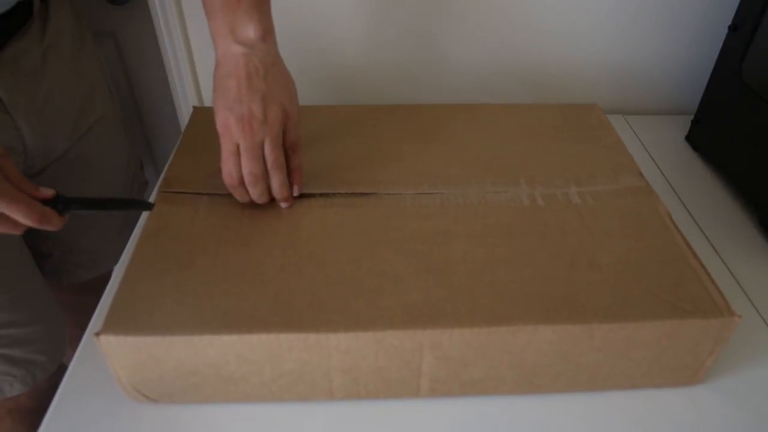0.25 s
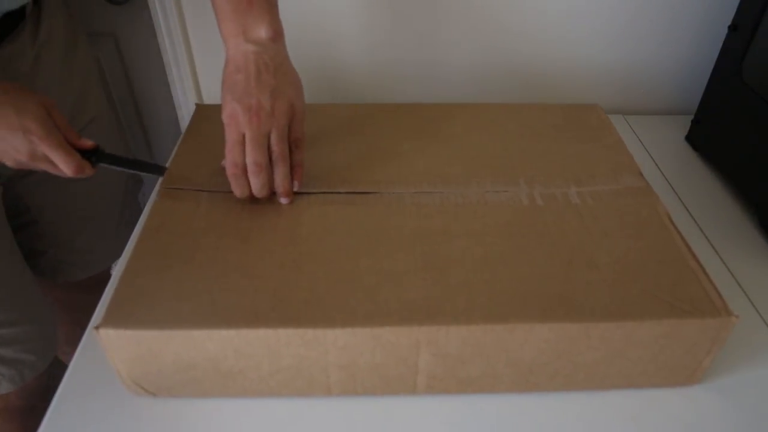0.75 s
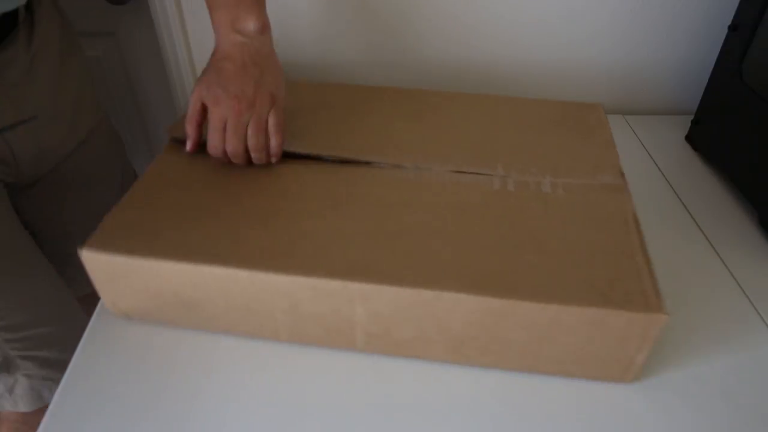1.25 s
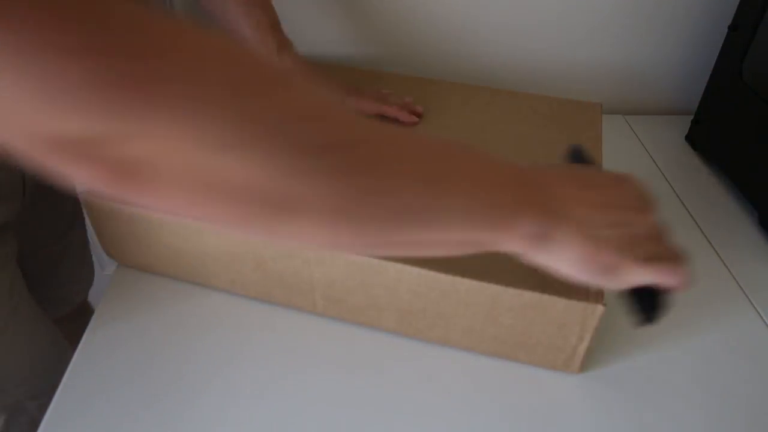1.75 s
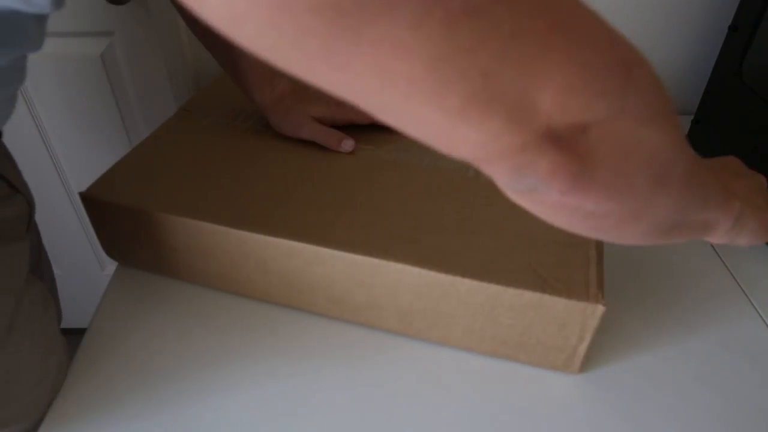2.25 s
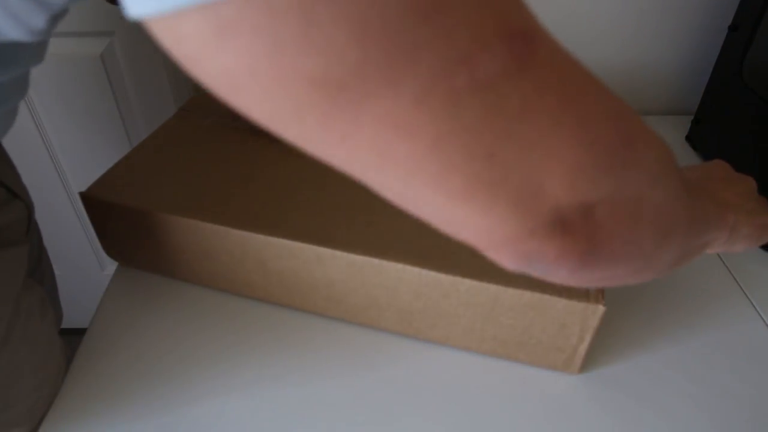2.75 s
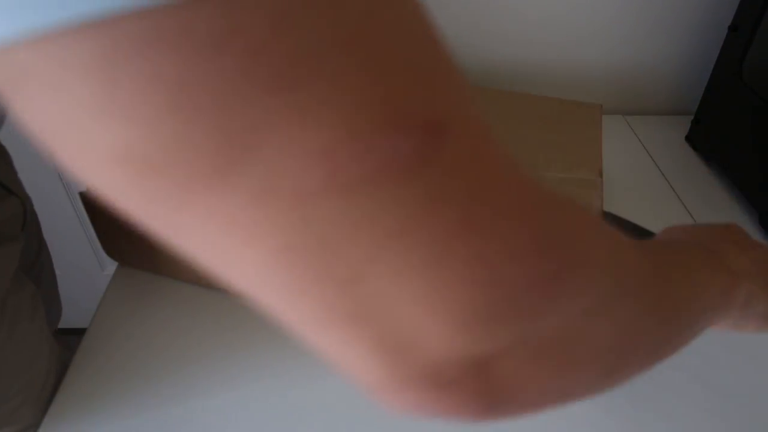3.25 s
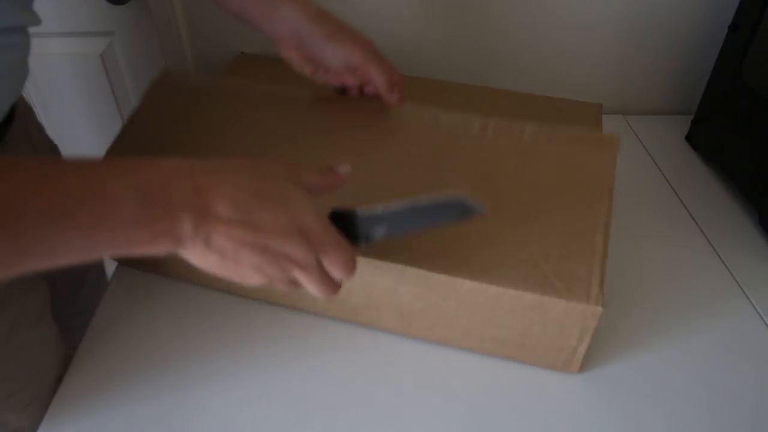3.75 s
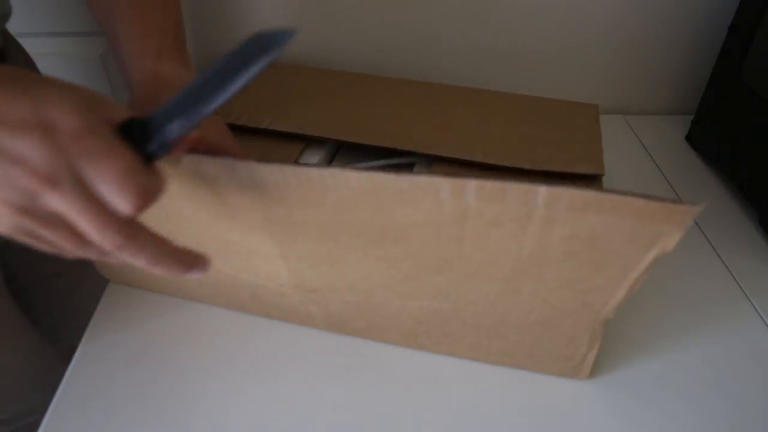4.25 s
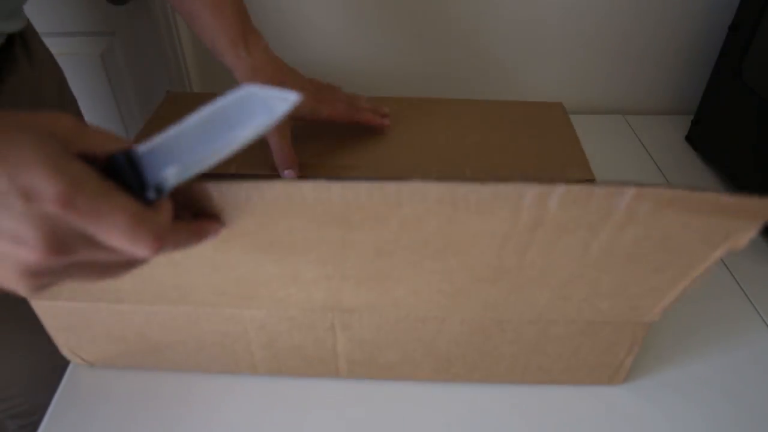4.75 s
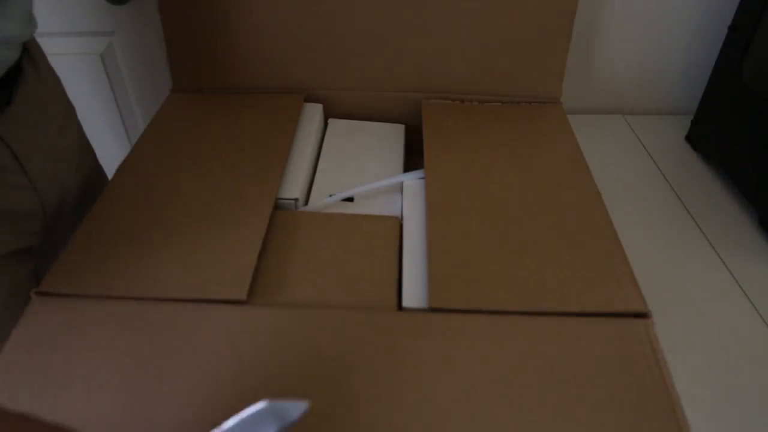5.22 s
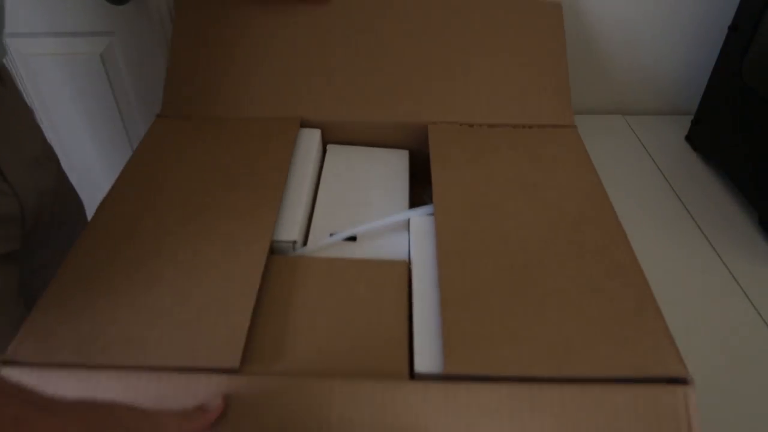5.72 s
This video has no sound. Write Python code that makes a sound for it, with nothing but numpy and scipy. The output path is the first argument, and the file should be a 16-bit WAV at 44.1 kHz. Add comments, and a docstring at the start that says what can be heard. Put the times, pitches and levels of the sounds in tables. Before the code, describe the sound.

A knife saws and slits packing tape on a cardboard box, which knocks on a table before its flaps scrape and flop open.

```python
"""Hands rub faintly on a cardboard box in a small room; then a knife saws through its packing tape.
The box is swung round and set down, the far tape is slit, and the flaps rub, snap, squeak and flop
open; at last the box is dragged over the table and judders. Blade and board sound by stick-slip
friction, radiated by the cardboard. Blows excite the damped modes of the panels and the table top,
and tape and fibres crack as they break."""
import sys
import numpy as np
from scipy import signal
from scipy.fft import rfft, irfft, next_fast_len
from scipy.io import wavfile
from scipy.ndimage import map_coordinates

SR = 44100
rng = np.random.default_rng(int(sys.argv[2]) if len(sys.argv) > 2 else 0)


def pcm_store(signal):
    """Save signal as 16-bit PCM."""
    levels = np.round(np.clip(np.atleast_2d(signal), -1, 1) * 32767)
    wavfile.write(sys.argv[1], SR, levels.astype(np.int16).T)


N = 263718

# In every stroke the attack leads up to start_s; drum_db and hiss_db are relative to scrape_db.
# The knife saws the near tape: start_s, hold_s, scrape_db, drum_db, hiss_db
SAW_STROKES = [(0.579, 0.015, -50, 3, -5.5), (0.619, 0.015, -54, 6.5, -2.5),
               (0.72, 0.033, -52.5, 6.5, -10.5), (0.843, 0.0087, -53.5, 4.5, -5),
               (0.872, 0.011, -58, 8, -17), (0.979, .01, -58, -3.5, -4), (1.005, 0.029, -52, 3.5, -3.5)]
# The blade slits the far corner: start_s, hold_s, attack_s, release_s, scrape_db, drum_db, hiss_db
SLIT_STROKES = [(3.025, .06, 0.051, .06, -65.5, -3, -11), (3.16, 0.029, .115, .125, -47, 8.5, -5),
                (3.3, 0.064, 0.032, .025, -69.5, 8, 4.5)]
# The knife's point scratches: start_s, hold_s, attack_s, release_s, scrape_db, drum_db, hiss_db
SCRATCH_STROKES = [(2.19, 0.047, 0.063, 0.073, -64, 10, -6), (2.246, 0.0082, .025, 0.026, -53.5, 0, -15),
                   (2.595, 0.0058, 0.082, 0.023, -65.5, 7, -2),
                   (2.793, 0.0037, 0.01, 0.025, -56.5, 7.5, 2.5)]
# The box slides on the table: start_s, hold_s, attack_s, release_s, scrape_db, drum_db, hiss_db
SLIDE_STROKES = [(1.18, .35, .07, .065, -49, 2.5, -3.5), (5.63, 0.2575, .1, .03, -48, 1.5, -10.5)]
# The dragged box judders: start_s, hold_s, attack_s, release_s, scrape_db, drum_db, hiss_db
JUDDER_STROKES = [(5.903, 0.049, .007, .07, -38, 6.5, -12)]
# A flap chatters as it lifts: start_s, hold_s, attack_s, release_s, scrape_db, drum_db, hiss_db
LIFT_STROKES = [(3.715, 0.0594, .08, .085, -50, 13.5, -21.5)]
# A flap rips free of its tape: start_s, hold_s, attack_s, release_s, scrape_db, drum_db, hiss_db
RIP_STROKES = [(4.123, .042, .014, .075, -50.5, -0.5, -1.5)]
# Hands and flaps rub the board: start_s, hold_s, attack_s, release_s, scrape_db, drum_db, hiss_db
RUB_STROKES = [(0.04, .13, 0.12, 0.15, -73, 3.5, -18), (0.32, 0.027, 0.074, 0.094, -74, 10.5, -17),
               (1.62, 0.06, .025, 0.088, -63, 15, -6), (1.845, 0.018, 0.017, 0.074, -51, 4.5, -13),
               (1.938, 0.011, .08, 0.032, -48.5, 2, -7.5), (2.02, 0.1, 0.047, 0.095, -66, 4.5, -26),
               (3.47, .095, .04, .08, -61, 7.5, -9), (3.845, 0.044, .07, 0.067, -59, 1.5, -9.5),
               (4.045, 0.077, .085, 0.044, -66.5, 7, -8), (4.35, .1, .3, .25, -49.5, -6, -9),
               (4.56, 0.18, .14, 0.045, -51, -4, -6.5)]
# Flaps fold along their creases: start_s, hold_s, attack_s, release_s, scrape_db, drum_db, hiss_db
FOLD_STROKES = [(4.77, 0.024, 0.018, .11, -55.5, 5.5, -17.5), (4.885, .015, .03, 0.057, -53, 9, -15),
                (4.935, 0.02, .04, 0.35, -50.5, -5, -11.5), (5.252, 0.0077, 0.044, 0.032, -57.5, -18, -12),
                (5.388, .005, 0.028, 0.055, -57.5, 6, -9), (5.47, 0.024, 0.047, 0.057, -65.5, 16.5, -11),
                (5.521, 0.0057, .03, 0.036, -49.5, 3.5, -16.5)]
# Blows on the box; the panels' ring and the loose flaps' clatter are relative to level_db:
# start_s, level_db, push_hz, push_cycles, ring_db, clatter_db, crack_db
BLOWS = [(0.44, -49.5, 180, .59, 11.5, -4.5, -42.5), (1.277, -35, 146, .53, -6.5, -7, -35),
         (1.408, -22, 596, 1.55, -10, -12.5, -24), (1.502, -14, 241.6, 1.18, -6.5, -7.5, -30),
         (1.509, -24.5, 138.5, .6, -3.5, -11, -55), (1.562, -25, 99, 0.16, -8, -26, -59.5),
         (1.633, -31, 250, 0.3, 8, -19, -40), (1.833, -29.5, 145, 0.28, -1, -19.5, -43),
         (2.096, -25.5, 443, 0.56, 7, -9, -47), (2.384, -59, 168, 0.62, 3, 1.5, -62),
         (2.605, -35.5, 169, 0.21, 10, -4, -41), (2.809, -30, 197, .35, 7.5, -4, -43.5),
         (3.18, -39, 198, 0.6, 2, -9, -28), (3.252, -30, 1085, 1.2, -4, -10.5, -36),
         (3.31, -42, 444, 0.96, -12, -5, -62), (3.504, -45, 262, 0.89, -8, -3.5, -47),
         (3.76, -36.5, 107, 0.96, -8, -18, -68), (4.176, -40, 136, 0.73, -14, -3, -58),
         (4.516, -45, 83, 0.63, 3.5, -13, -64), (4.738, -8.5, 116, 0.33, -29, -21, -37),
         (4.762, -28, 226, 0.53, 10.5, -19, -38.5), (4.868, -36.5, 234, .48, 2, -6, -38),
         (4.895, -33.5, 165, 0.33, -18, -13, -55), (5.116, -39.5, 112, 0.74, -10, -10, -61),
         (5.391, -25, 376, 0.36, 0, -13, -42), (5.406, -24.5, 67.4, 0.42, -26, -16, -56),
         (5.426, -28.5, 201, 0.14, -3.5, -10, -48.5)]
# Tape and fibres breaking: start_s, level_db, relative_treble_db
FRACTURES = [(0.282, -52.5, -16), (0.4942, -50, 7.5), (0.5053, -37, -20), (0.8862, -56, 5),
             (1.0248, -30.5, -3), (1.407, -27.5, -6), (1.4114, -20.5, -11.5), (1.4184, -33, -9.5),
             (1.5818, -38, -16), (1.6387, -31, -8.5), (1.6554, -24, -16), (1.7086, -28.5, -16.5),
             (2.2506, -47.5, -13), (2.383, -63, 1), (2.5995, -39, -8.5), (2.796, -40, -7),
             (2.8065, -42, -4), (3.1065, -36, -9), (3.1416, -32.5, -12), (3.1615, -27.5, -3),
             (3.1795, -29.5, -5), (3.2201, -41, -1), (3.3687, -37.5, -14), (3.6056, -48, -13),
             (3.801, -50, -4), (4.7978, -42.5, -8.5), (5.3988, -36.5, -33), (5.902, -31, -6)]
# Cardboard edges squeaking past each other: peak_s, level_db, pitch_hz, half_length_s
EDGE_SQUEAKS = [(5.027, -65, 1870, .04), (5.186, -60.5, 593, 0.062), (5.251, -55, 1401, 0.018),
                (5.496, -49, 1300, 0.017), (5.526, -46.5, 1313, 0.0086)]

# Spectrum of the sawing edge: frequency_hz, density_db
SAW_SPECTRUM = [(41, -48), (70, -21), (124, -4.5), (208, -5.5), (422, -3.5), (554, -13.5), (1250, -14.5),
                (1440, -10.5), (2020, -14.5), (2220, -20), (3650, -15.5), (4190, -19.5), (10600, -22),
                (14000, -27), (16000, -31.5)]
# Spectrum of the blade in the corner: frequency_hz, density_db
SLIT_SPECTRUM = [(41, -46), (70, -13), (124, -6), (208, 4), (268, -5.5), (336, -6.5), (744, -16.5),
                 (1050, -14), (1200, -23), (1650, -11.5), (2540, -20.5), (3910, -14), (5020, -23),
                 (12200, -19), (16000, -36.5)]
# Spectrum of the scratching point: frequency_hz, density_db
SCRATCH_SPECTRUM = [(100, -11), (300, -6.5), (700, -7), (1000, -23), (2000, -25.5), (4500, -31.5),
                    (8000, -36.5), (11000, -35), (16000, -35.5)]
# Spectrum of the sliding base: frequency_hz, density_db
SLIDE_SPECTRUM = [(41, -26), (70, -12), (145, -3.5), (186, 0), (300, 1), (328, -1.5), (506, -9.5),
                  (727, -9), (955, -17.5), (1200, -12), (2540, -15), (3740, -16), (4800, -27.5),
                  (10900, -33.5), (16000, -49)]
# Spectrum of the juddering box: frequency_hz, density_db
JUDDER_SPECTRUM = [(70, -7.5), (140, -2.5), (220, -8.5), (420, 2), (620, -15), (900, -19), (1130, -7.5),
                   (1600, -17), (2600, -19), (3500, -15.5), (5500, -34), (11000, -34), (16000, -48)]
# Spectrum of the chattering flap: frequency_hz, density_db
LIFT_SPECTRUM = [(35, -34), (60, -11), (142, -6), (287, -9), (437, -10.5), (480, -21.5), (767, -24),
                 (2840, -39), (3340, -34), (5090, -48.5), (11000, -39), (16000, -58)]
# Spectrum of ripping tape: frequency_hz, density_db
RIP_SPECTRUM = [(200, -7), (700, -7), (1400, -5), (2500, -1), (6500, -12), (9000, -10.5), (11500, -19),
                (16000, -29)]
# Spectrum of rubbed board: frequency_hz, density_db
RUB_SPECTRUM = [(41, -54), (70, 3.5), (159, 12), (204, 10), (280, 10), (321, 7.5), (635, -1), (834, -3),
                (977, -7.5), (1980, -7), (2780, -12), (3570, -7.5), (5020, -21.5), (11100, -22),
                (16000, -38)]
# Spectrum of a bending crease: frequency_hz, density_db
FOLD_SPECTRUM = [(59, -28), (100, 9), (239, 1), (350, 2.5), (415, -2), (461, 5), (558, -6), (1830, -12),
                 (2170, -16.5), (3540, -16.5), (5770, -28.5), (10900, -16), (16000, -32.5)]
# Spectrum of breaking fibres: frequency_hz, density_db
CRACK_SPECTRUM = [(88, -43.5), (150, -8), (406, 9.5), (624, 10.5), (805, -12), (1190, -7.5), (1360, -11),
                  (2500, -15.5), (3490, -10.5), (4860, -24), (6390, -19.5), (14500, -25), (16000, -44)]
# Spectrum of loose flaps clattering: frequency_hz, density_db
CLATTER_SPECTRUM = [(150, -22.5), (330, 8.5), (650, 0.5), (1100, -14), (2500, -18), (6000, -60.5)]
# Spectrum of the room's hush: frequency_hz, density_db
HUSH_SPECTRUM = [(15, -44), (25, -6), (145, 1.5), (354, -28.5), (591, -7), (695, -18), (1740, -23.5),
                 (2550, -29), (3430, -27.5), (16000, -28.5)]

# Resonances of the fluted board: centre_hz, width_hz, gain_db
FLUTE_PEAKS = [(465, 90, -2), (1284, 64, -17.5), (1690, 150, -8), (3080, 570, -2.5), (3590, 180, 1.5)]
# Resonances of the steel blade: centre_hz, width_hz, gain_db
STEEL_PEAKS = [(460, 92, 5.6), (1830, 200, 12.5), (4440, 40, 11), (5130, 48, 8.8), (5910, 98, 14.5),
               (7400, 160, 17), (7520, 240, 20)]
# Resonances of the shaken box: centre_hz, width_hz, gain_db
BOX_PEAKS = [(135, 39, 4), (200, 22, 9.5), (397, 85, -3), (1090, 110, -22), (3420, 630, -8)]
# Modes of the box panels: pitch_hz, level_db, t60_s
PANEL_MODES = [(101.8, 5.5, 0.22), (135.6, 10.5, 0.19), (181, -7.5, 0.14), (230.6, -6, 0.33),
               (276, -1, 0.31), (327, -8.5, 0.21), (395, -14.5, .14), (459, -4.5, 0.069), (550, -8.5, .13),
               (598, -5.5, .13), (784, -7.5, 0.094)]
# Modes of the table top: pitch_hz, level_db, t60_s
TABLE_MODES = [(56, 3.5, 0.26), (62, -8.5, 0.14), (79.6, 9, 0.17)]
# Reverberation time of the room: frequency_hz, t60_s
ROOM_DECAY = [(200, 0.35), (700, 0.21), (2300, 0.27), (3600, 0.31), (6000, 0.26), (12000, 0.087)]
# Colour of the reverberation: frequency_hz, gain_db
ROOM_COLOUR = [(80, -10), (350, -0.5), (4000, -3.5), (12000, 2)]


def amp(db):
    """Amplitude grows tenfold for every 20 dB."""
    return 10 ** (np.asarray(db) / 20)


def unit(x):
    """Normalisation to an rms of 1."""
    return x / np.sqrt(np.mean(x ** 2) + 1e-20)


def along(points, hz):
    """Interpolation of (hz, value) points on a logarithmic frequency axis."""
    knots_hz, values = np.transpose(points)
    return np.interp(np.log(hz + 1), np.log(knots_hz + 1), values)


def filtered(x, response):
    """Linear filtering: the spectrum is multiplied by a frequency response."""
    size = next_fast_len(len(x) + 8192)
    return irfft(rfft(x, size) * response(np.fft.rfftfreq(size, 1 / SR)), size)[:len(x)]


def add(track, start_s, sound):
    """Superposition: a sound sums into the track from start_s on."""
    start = max(round(start_s * SR), 0)
    part = track[start:start + len(sound)]
    part += sound[:len(part)]


def registers(hz):
    """A crossover into drumming, scraping and hissing bands whose powers sum to one."""
    low = 1 / (1 + (hz / 900) ** 8)
    high = 1 - 1 / (1 + (hz / 5000) ** 12)
    return np.sqrt([low, np.abs(1 - low - high), high])


def resonant(peaks, hz):
    """Gain of Lorentzian resonances that add in power to a flat response."""
    power = sum(amp(db) ** 2 / (1 + (2 * (hz - centre) / width) ** 2) for centre, width, db in peaks)
    return np.sqrt(1 + power)


def wobble(size, rate_hz):
    """Smooth random modulation, interpolated through rate_hz knots a second."""
    knots = rng.standard_normal(int(size * rate_hz / SR) + 4)
    return map_coordinates(knots, [np.arange(size) * rate_hz / SR])


def coloured_noise(size, spectrum):
    """Spectral shaping of white noise, at an rms of 1."""
    return unit(filtered(rng.standard_normal(size), lambda hz: amp(along(spectrum, hz))))


def hush():
    """Stationary noise forms the room's faint floor."""
    return amp(-71.5) * coloured_noise(N, HUSH_SPECTRUM)


def room(x):
    """Reverberation: reflections from close walls decay exponentially in a tail thin in the bass."""
    hz, t, noise = signal.stft(rng.standard_normal(SR // 2), SR, nperseg=256)
    decay = amp(-60 * t / along(ROOM_DECAY, hz)[:, None])
    tail = signal.istft(noise * decay, SR, nperseg=256)[1]
    tail = filtered(tail / np.linalg.norm(tail), lambda hz: amp(along(ROOM_COLOUR, hz)))
    delayed = np.pad(x, (SR // 250, 0))
    return signal.fftconvolve(delayed, tail)[:N]


def squeaks():
    """Nearly periodic stick-slip gives a cardboard edge a brief, rough pitch."""
    out, t = np.zeros(N), np.arange(-SR // 8, SR // 8) / SR
    for peak_s, level_db, pitch_hz, half_length_s in EDGE_SQUEAKS:
        phase = 2 * np.pi * np.cumsum(pitch_hz * (1 + 0.055 * wobble(len(t), rate_hz=400))) / SR
        swell = np.exp(-(t / half_length_s) ** 2) * amp(level_db + 3 * wobble(len(t), rate_hz=154.4))
        add(out, peak_s + t[0], swell * unit(np.sin(phase) + amp(-17) * np.sin(2 * phase)))
    return out


def slips(size, slip_hz, scatter_db, smooth_db):
    """Shot noise: tiny catches of random size and timing stand over smooth friction; rms 1."""
    catches = (rng.random(size) < slip_hz / SR) * rng.choice([-1, 1], size)
    sizes = amp(scatter_db * np.clip(rng.standard_normal(size), -2, 2))
    return unit(unit(catches * sizes) + amp(smooth_db) * rng.standard_normal(size))


def standing_waves(x, ripple_db):
    """Modal coupling: a contact favours some panel resonances and misses others; treble modes merge."""
    hz, _, spectra = signal.stft(x, SR, nperseg=1024)
    smoothing = np.outer(np.hanning(6), np.hanning(12))
    coupling = unit(signal.fftconvolve(rng.standard_normal(spectra.shape), smoothing, "same"))
    depth_db = ripple_db / np.sqrt(1 + (hz / 3500) ** 2)
    return signal.istft(spectra * amp(depth_db[:, None] * coupling), nperseg=1024)[1][:len(x)]


def crack(treble_db, rise_s, t60_s):
    """Fracture: a flurry of breaking fibres dies quickly, and the board's flutes ring on."""
    t = np.arange(SR // 6) / SR
    fibres = standing_waves(slips(len(t), slip_hz=4300, scatter_db=7.5, smooth_db=1), ripple_db=4)
    body, treble = [unit(filtered(fibres, lambda hz: amp(along(CRACK_SPECTRUM, hz)) * registers(hz)[k]))
                    for k in (1, 2)]
    flutes = unit(filtered(fibres, lambda hz: 1 / (1 + ((hz - 3480) / 380) ** 2)))
    burst = (body + amp(treble_db) * treble) * amp(-60 * t / t60_s)
    return (burst + amp(-25 - 60 * t / 0.18) * flutes) * (1 - np.exp(-t / rise_s))


def snaps():
    """Sudden release of strain: tape and fibres give way, each with one short crack."""
    out = np.zeros(N)
    for start_s, level_db, treble_db in FRACTURES:
        add(out, start_s, amp(level_db) * crack(treble_db, rise_s=0.0011, t60_s=0.022))
    return out


def knocks():
    """Impact excitation: a blow cracks, pushes a panel out and back, and rings the box and table."""
    out, t = np.zeros(N), np.arange(SR // 3) / SR
    heavy_push_hz, crack_lead_s = 120, 0.001504
    # each mode takes up the part of the push that lies at its own pitch
    panels = sum(amp(db - 60 * t / t60) * np.cos(2 * np.pi * hz * t) * 2 * np.log(1000) / (t60 * SR)
                 for hz, db, t60 in PANEL_MODES)
    table = sum(amp(db - 60 * t / t60) * np.sin(2 * np.pi * hz * t) for hz, db, t60 in TABLE_MODES)
    for start_s, level_db, push_hz, push_cycles, ring_db, clatter_db, crack_db in BLOWS:
        progress = t * push_hz / push_cycles
        push = -progress * np.exp(1 - progress) * np.sin(2 * np.pi * push_hz * t)
        ring = amp(ring_db) * signal.fftconvolve(push, panels)[:len(t)]
        flaps = coloured_noise(len(t), CLATTER_SPECTRUM)
        clatter = amp(clatter_db - 60 * t / 0.085) * flaps * (1 - np.exp(-t / 0.0014))
        # a slow, heavy push thuds in the table; what rings in the panels stays out of it
        octaves_above = max(np.log2(push_hz / heavy_push_hz), 0)
        thud_db = -16.5 - 3 * octaves_above - max(ring_db, 0)
        thud = amp(thud_db) * table * (1 - np.exp(-t / 0.0076))
        add(out, start_s, amp(level_db) * (push + ring + clatter - thud))
        add(out, start_s - crack_lead_s, amp(crack_db) * crack(treble_db=-24, rise_s=0.002, t60_s=0.039))
    return out


def friction(strokes, spectrum, peaks, slip_hz, scatter_db, smooth_db, grip_db, grip_hz, ripple_db,
             gain_db_per_s=0, drum_db_per_s=0, arch_db=0):
    """Stick-slip friction drives the board in strokes that swell, hold and fade with a wavering grip."""
    out = np.zeros(N)
    ramp_db, lift_off_db = 20, 27  # span of an attack or release; drop at which contact is lost
    reach = lift_off_db / ramp_db
    for start_s, hold_s, attack_s, release_s, scrape_db, drum_db, hiss_db in strokes:
        t = np.arange(max(-reach * attack_s, -start_s), hold_s + reach * release_s, 1 / SR)
        away = np.maximum(-t / attack_s, 0) + np.maximum((t - hold_s) / release_s, 0)
        past_middle_s = np.clip(t, 0, hold_s) - hold_s / 2
        effort_db = gain_db_per_s * past_middle_s - ramp_db * away
        contact = np.clip((reach - away) / .2, 0, 1)
        force = standing_waves(slips(len(t), slip_hz, scatter_db, smooth_db), ripple_db)
        force *= amp(grip_db * wobble(len(t), grip_hz))
        # pressure drums the panels, speed brings out the hiss
        low_db = drum_db + effort_db + drum_db_per_s * past_middle_s
        speed_db = arch_db * (np.cos(np.pi * past_middle_s / hold_s) - 2 / np.pi)
        high_db = hiss_db + 1.16 * effort_db + speed_db
        for k, band_db in enumerate([low_db, effort_db, high_db]):
            band = filtered(force,
                            lambda hz: amp(along(spectrum, hz)) * resonant(peaks, hz) * registers(hz)[k])
            add(out, start_s + t[0], unit(band) * contact * amp(scrape_db + band_db))
    return out


def cardboard():
    """Friction of board: the base slides and judders; flaps chatter, rip free, rub and fold."""
    # the sliding box bears down ever harder and moves fastest halfway
    slide = friction(SLIDE_STROKES, SLIDE_SPECTRUM, FLUTE_PEAKS, slip_hz=4000, scatter_db=1,
                     smooth_db=-0.5, grip_db=1.07, grip_hz=60, ripple_db=2.66,
                     gain_db_per_s=13, drum_db_per_s=19, arch_db=9.5)
    judder = friction(JUDDER_STROKES, JUDDER_SPECTRUM, BOX_PEAKS, slip_hz=700, scatter_db=-0.5,
                      smooth_db=0, grip_db=1.5, grip_hz=204, ripple_db=3.5)
    # the rising flap shakes the box more and more
    lift = friction(LIFT_STROKES, LIFT_SPECTRUM, BOX_PEAKS, slip_hz=480, scatter_db=0.5,
                    smooth_db=-1.5, grip_db=2.9, grip_hz=270, ripple_db=3.5, drum_db_per_s=94)
    rip = friction(RIP_STROKES, RIP_SPECTRUM, FLUTE_PEAKS, slip_hz=1500, scatter_db=3.5,
                   smooth_db=-1.5, grip_db=0, grip_hz=290, ripple_db=4)
    rub = friction(RUB_STROKES, RUB_SPECTRUM, FLUTE_PEAKS, slip_hz=2000, scatter_db=-1,
                   smooth_db=0, grip_db=1.36, grip_hz=73, ripple_db=3.5)
    fold = friction(FOLD_STROKES, FOLD_SPECTRUM, FLUTE_PEAKS, slip_hz=2000, scatter_db=2,
                    smooth_db=3, grip_db=1.1, grip_hz=75, ripple_db=3.5)
    return slide + judder + lift + rip + rub + fold


def knife():
    """Friction of steel: the edge saws and slits the tape; the scratching point makes the blade ring."""
    attack_s, release_s = .026, .056
    strokes = [(start_s, hold_s, attack_s, release_s, *dbs) for start_s, hold_s, *dbs in SAW_STROKES]
    saw = friction(strokes, SAW_SPECTRUM, FLUTE_PEAKS, slip_hz=1800, scatter_db=-0.5,
                   smooth_db=1.5, grip_db=2.8, grip_hz=260, ripple_db=3)
    slit = friction(SLIT_STROKES, SLIT_SPECTRUM, FLUTE_PEAKS, slip_hz=2000, scatter_db=2,
                    smooth_db=1.5, grip_db=3.5, grip_hz=230, ripple_db=4)
    scratch = friction(SCRATCH_STROKES, SCRATCH_SPECTRUM, STEEL_PEAKS, slip_hz=2500, scatter_db=-0.5,
                       smooth_db=1.5, grip_db=3.1, grip_hz=95.2, ripple_db=3)
    return saw + slit + scratch


def scene():
    """Direct sound, the room's hush and reverberation superpose in one channel."""
    direct = knife() + cardboard() + squeaks() + knocks() + snaps()
    return (direct + hush() + amp(-13) * room(direct))[None]


def record(dry):
    """Band limiting: the microphone's bass rolls off, and nothing passes above the top frequency."""
    bass_hz, top_hz = 32., 15850
    return np.array([filtered(x, lambda hz: (hz < top_hz) * hz ** 3 / np.sqrt(hz ** 6 + bass_hz ** 6))
                     for x in dry])


dry = scene()
out = record(dry)
pcm_store(out)
```